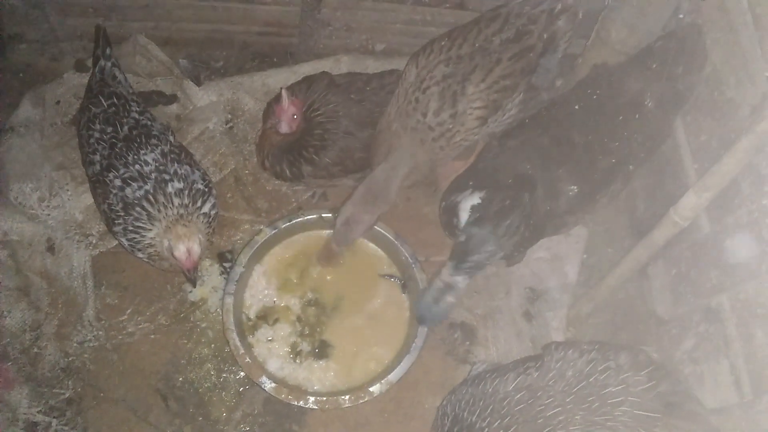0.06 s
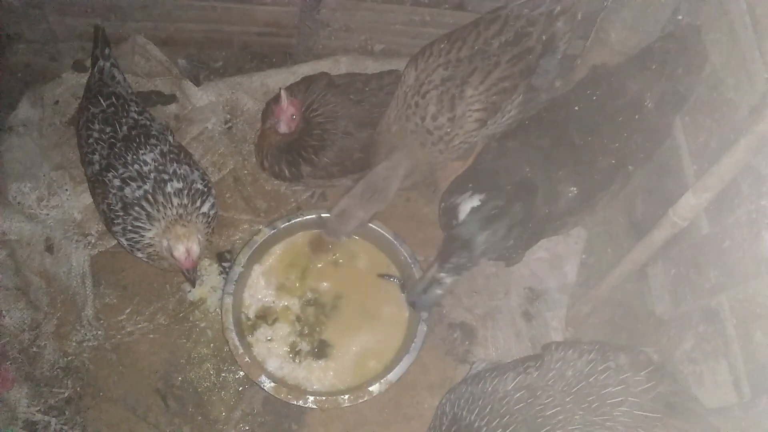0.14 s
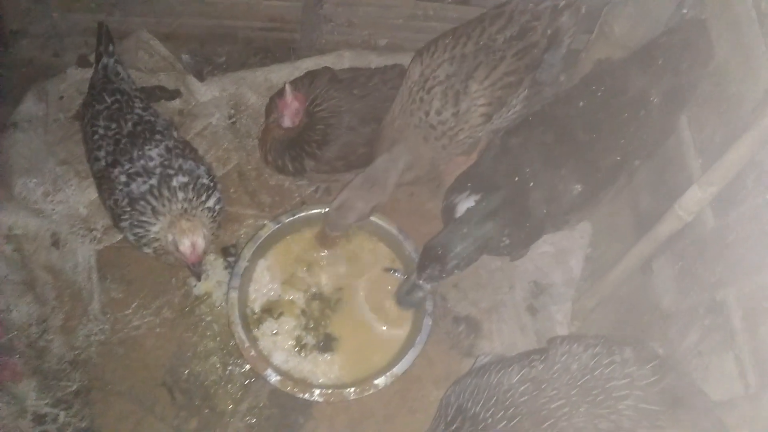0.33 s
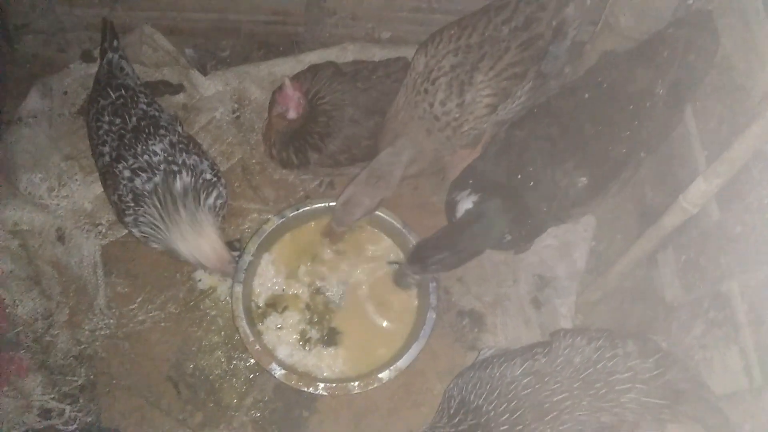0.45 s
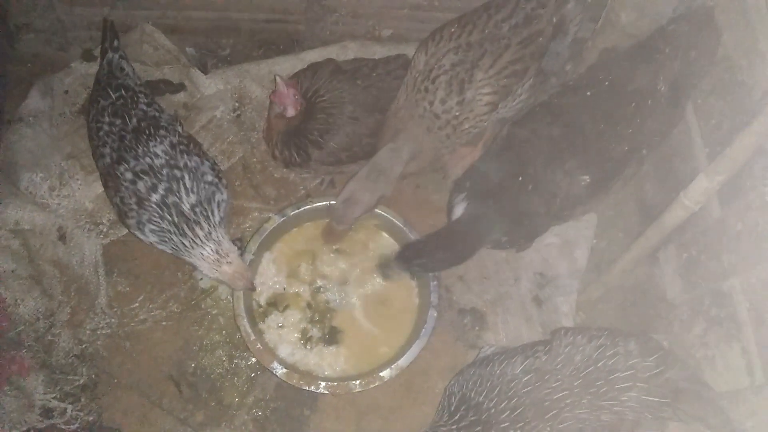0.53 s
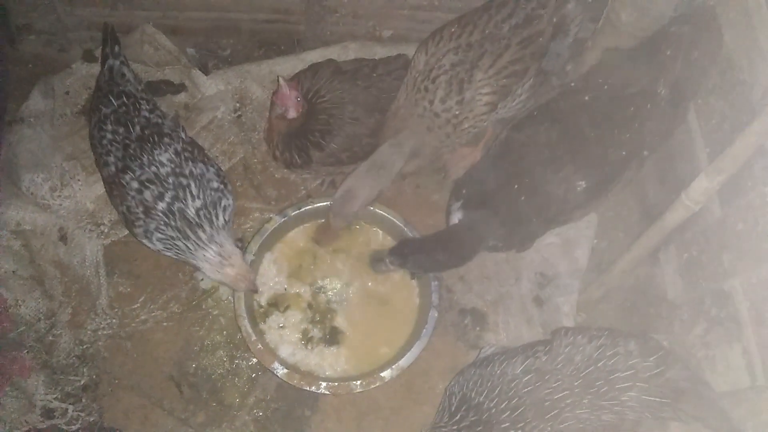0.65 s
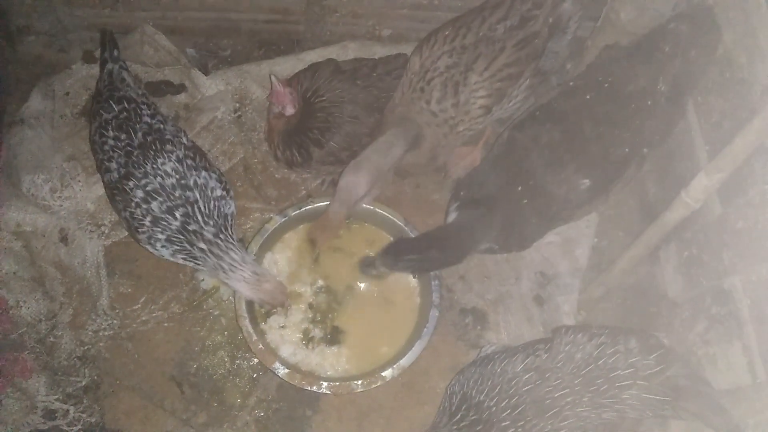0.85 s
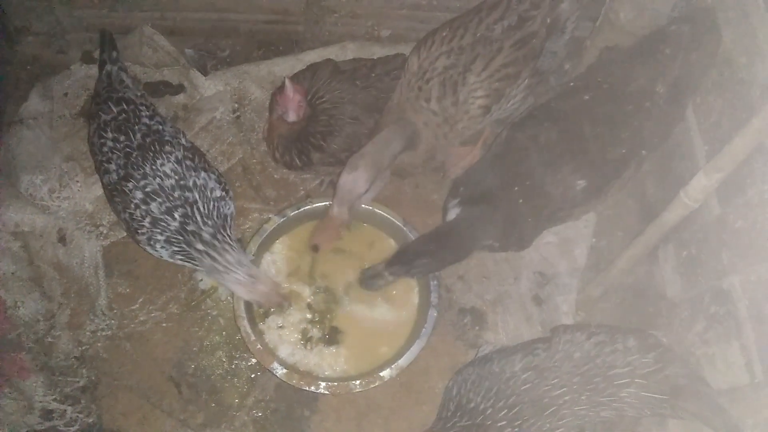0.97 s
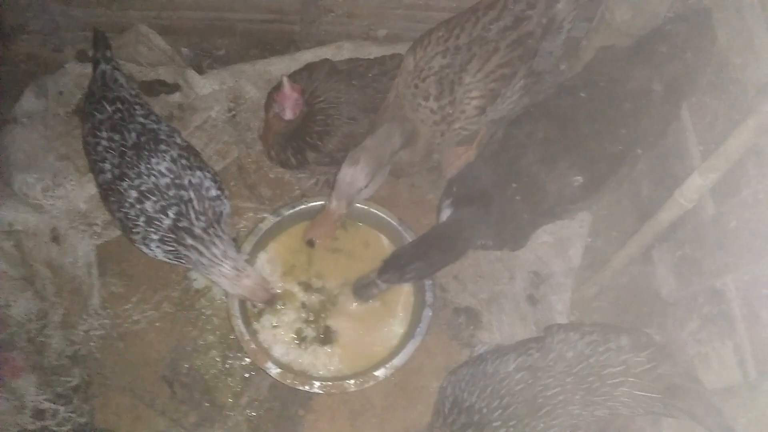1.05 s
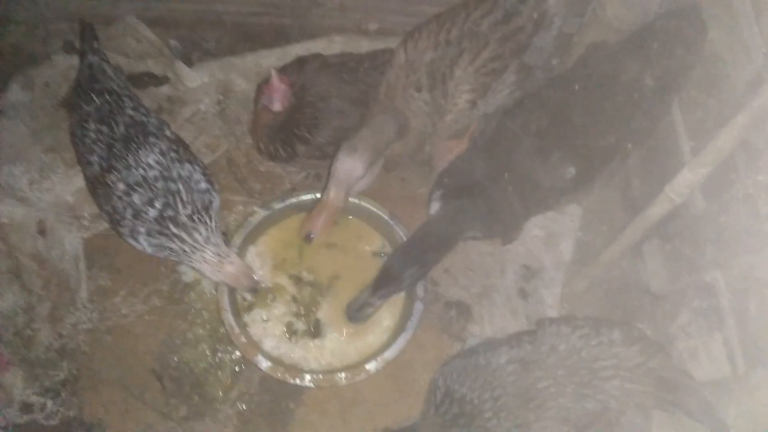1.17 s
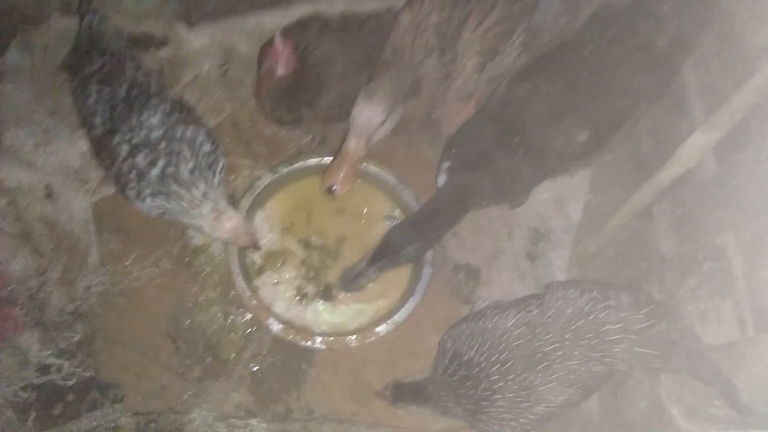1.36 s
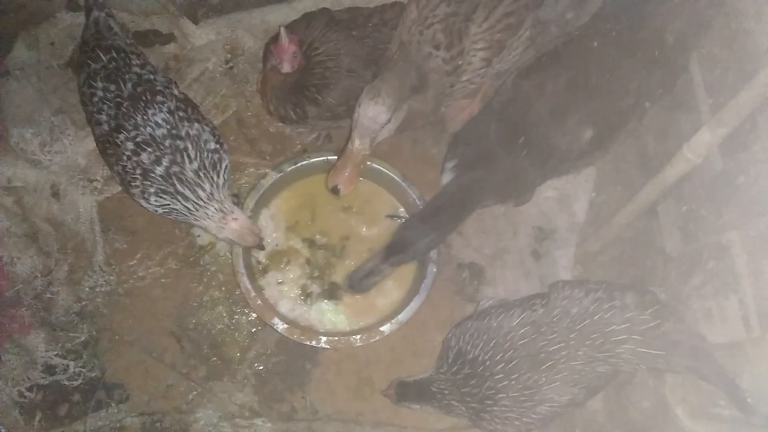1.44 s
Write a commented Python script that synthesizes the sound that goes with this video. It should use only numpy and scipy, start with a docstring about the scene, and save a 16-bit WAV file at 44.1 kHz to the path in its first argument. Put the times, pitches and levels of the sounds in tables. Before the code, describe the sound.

Rapid wet slurping and bubbly plopping as ducks' bills stir thin feed in a metal bowl

```python
"""In a small pen, ducks dabble in a metal bowl of watery feed, with a phone about a metre above.
Bills open air pockets that plop as short rising tones and throw sprays made of many tiny ringing drops.
Small bubbles, fine fizz and a low slosh, made of grains and filtered noise, fill the gaps.
One plink runs on as a thin wavering note; a dull knock, soft taps and low booms are fading tones.
The pen adds a short noise-like echo, and a faint steady air noise lies underneath."""
import sys
import numpy as np
from scipy import signal
from scipy.fft import rfft, irfft
from scipy.io import wavfile

SR = 44100
rng = np.random.default_rng(int(sys.argv[2]) if len(sys.argv) > 2 else 0)


def wav_out(sig):
    """Save sig, one row per channel (or a flat mono array), as 16-bit PCM at SR to the path in sys.argv[1]."""
    wavfile.write(sys.argv[1], SR, np.round(np.clip(np.atleast_2d(sig).T, -1, 1) * 32767).astype(np.int16))


N = 66150  # samples: 1.5 seconds


def undb(db):
    """Turn decibels into a plain multiplier."""
    return 10 ** (np.asarray(db) / 20)


def unit(x):
    """Scale a sound to an average (rms) strength of 1."""
    return x / np.sqrt(np.mean(x ** 2) + 1e-20)


def clock():
    """Time of every sample, in seconds."""
    return np.arange(N) / SR


def frequencies():
    """Frequency of every spectrum step in Hz, plus 1 so that none is zero."""
    return np.arange(N // 2 + 1) * SR / N + 1


def curve(table, col=1):
    """Draw a level over time from rows of time and decibels."""
    rows = np.array(table)
    return undb(np.interp(clock(), rows[:, 0], rows[:, col]))


def colour(x, table):
    """Shape the tone of a sound by points of frequency and decibels."""
    hz, db = np.array(table).T
    gain = undb(np.interp(np.log(frequencies()), np.log(hz), db))
    return irfft(rfft(x) * gain, N)


def band(hz, width_hz):
    """Random noise gathered around one pitch by a steep resonance, rms 1."""
    f = frequencies()
    resonance = 1 / (1 + ((f * f - hz * hz) / (f * width_hz)) ** 2)
    return unit(irfft(rfft(rng.standard_normal(N)) * resonance, N))


def swell(age, rise, decay):
    """Rise smoothly up to age 0, then die away exponentially."""
    attack = np.sin(np.pi / 2 * np.clip(1 + age / rise, 0, 1)) ** 2
    return attack * np.exp(-np.maximum(age, 0) / decay)


PLOP_GLIDE = 0.084  # share of the pitch; a pocket shrinks, so its pitch rises
GRAIN_SCATTER_DB = 3


def grains(start, length, hz, octaves, cycles, count):
    """A cloud of tiny ringing bubbles of scattered pitch and size, rms 1 over its length."""
    when = start + length * (np.arange(count) + rng.random(count)) / count
    pitch = np.clip(hz * 2 ** (octaves * rng.standard_normal(count)), 300, 16000)[:, None]
    size = undb(GRAIN_SCATTER_DB * np.minimum(rng.exponential(size=count), 3))[:, None]
    k = np.arange(int(np.clip(3.5 * cycles * SR / hz, 96, 512)))  # samples within one grain
    turns = pitch * k / SR * (1 + PLOP_GLIDE * k / len(k) / 2)
    shape = (1 - np.exp(-turns ** 2)) * np.exp(-turns / cycles) * (1 - k / len(k))
    rings = size * np.sqrt(pitch / hz) * np.sin(2 * np.pi * turns) * shape
    # add every grain into the sound at its own moment
    at = np.maximum((when * SR).astype(int)[:, None] + k, 0)
    out = np.bincount(at.ravel(), rings.ravel(), N)
    return out[:N] * np.sqrt(length * SR / np.sum(out ** 2))


# air pockets opened by the bills, timed at their peak
# columns: peak_s [s], level_db [dB], pitch_hz [Hz], decay_ms [ms], froth [0-1]
PLOP_TABLE = [(0.2074, -32.5, 1580, 4.3, 0), (0.210, -36.5, 2250, 0.89, 0), (0.237, -32.5, 1803, 3.4, 0.1),
              (0.2619, -42.5, 1439, 7.4, 0), (0.268, -46.5, 2480, 19, 0.8), (0.306, -35.5, 1570, 7.4, 0.5),
              (0.3089, -33.5, 2746, 6.1, 0.55), (0.327, -29.5, 1963, 4, 0.3),
              (0.3293, -27.5, 2280, 5.1, 0.17), (0.404, -34, 1670, 3.9, 1), (0.408, -34, 2017, 4.7, 0),
              (0.4348, -21.5, 2347, 2.9, 0.24), (0.4677, -35, 1690, 3.6, 1), (0.471, -43.5, 990, 4.5, 0.26),
              (0.4978, -39, 2850, 4.4, 0.9), (0.531, -41, 1570, 1.3, 1), (0.5454, -36.5, 1884, 5.2, 0.25),
              (0.611, -37.5, 1654, 2.5, 0.3), (0.7052, -32, 2253, 0.58, 0.03),
              (0.8657, -38, 2334, 0.76, 0.01), (0.9378, -34.5, 2176, 4.6, 0.19),
              (1.042, -32, 2132, 3.4, 0.01), (1.125, -52.5, 2190, 3, 0), (1.147, -44.5, 1560, 7.6, 1),
              (1.168, -47, 2190, 2.8, 0), (1.212, -53.5, 3250, 6.1, 0.1), (1.223, -38, 1930, 3.2, 1),
              (1.225, -47.5, 1160, 6.4, 0.86), (1.331, -57.5, 905, 9.9, 0.5), (1.37, -51.5, 1130, 11, 1),
              (1.379, -41, 2600, 5, 0.66), (1.393, -47.5, 2420, 8.6, 0.06), (1.416, -49, 988, 9.9, 0.14),
              (1.427, -48.5, 1026, 7.9, 0.46), (1.465, -53, 1044, 4.4, 0.15), (1.496, -49, 3100, 3.3, 0)]
PLOP_RISE_S, GLIDE_S = 0.0016, 0.0064
FROTH_WIDTH = 0.35  # width of the froth noise, as a share of the pitch
# small bubbles that break off each frothy plop
SHED_DB, SHED_S, SHED_OCT, SHED_CYCLES = -15, .016, 0.37, 2.96


def plops():
    """Each air pocket rings for a few cycles, rising in pitch; froth roughens it and sheds smaller bubbles."""
    out = np.zeros(N)
    for peak_s, level_db, pitch_hz, decay_ms, froth in PLOP_TABLE:
        age = clock() - peak_s
        froth = np.clip(froth, 0, 1)
        glide = 1 + PLOP_GLIDE * np.tanh(age / GLIDE_S)
        phase = 2 * np.pi * np.cumsum(pitch_hz * glide) / SR
        clear = np.sin(phase - phase[int(peak_s * SR)])
        rough = band(pitch_hz, pitch_hz * FROTH_WIDTH)
        tone = clear * np.sqrt(1 - froth) + rough * np.sqrt(froth / 2)
        body = swell(age, PLOP_RISE_S, decay_ms / 1000) * tone
        shed = grains(peak_s, 4 * SHED_S, pitch_hz, SHED_OCT, SHED_CYCLES, count=24)
        shed = shed * swell(age, PLOP_RISE_S, SHED_S)
        out += undb(level_db) * (body + undb(SHED_DB) * np.sqrt(froth) * shed)
    return out


# bursts of droplets, timed at their peak
# columns: peak_s [s], level_db [dB], centre_hz [Hz], spread_octaves [octaves], decay_ms [ms]
SPRAY_TABLE = [(0.26, -57.5, 4160, 0.05, 9), (0.31, -52, 5060, 0.68, 6.7), (0.329, -43.5, 6440, 0.46, 6.3),
               (0.343, -43.5, 6820, 0.77, 8.5), (0.467, -54, 7700, 0.44, 9.4),
               (0.503, -50, 4050, 0.56, 6.1), (0.519, -51, 9500, 0.046, 4.9),
               (0.54, -43.5, 6200, 0.75, 2.4), (0.6111, -46.5, 4740, 0.704, 6.3),
               (0.61, -47.5, 9130, 0.056, 7.9), (0.662, -48.5, 5090, 0.63, 7.1),
               (0.683, -48, 10130, 0.68, 6.1), (0.7368, -53.5, 6760, 0.63, 1.5),
               (0.862, -62.5, 4240, 0.022, 4.16), (0.945, -53, 5840, 0.59, 12.6),
               (1.039, -57, 9200, 0.72, 7.3), (1.044, -42, 7590, 0.05, 2.5), (1.133, -61.5, 8920, 0.48, 21),
               (1.234, -60.5, 5400, 1.23, 13.2), (1.312, -56, 10170, 0.51, 7.5),
               (1.397, -51.5, 7760, 0.56, 7.4), (1.434, -42.5, 10730, 0.5, 3.3),
               (1.474, -49.5, 5130, 0.46, 7.9)]
SPRAY_RISE_SHARE = 0.42  # rise time as a share of the decay
DROP_CYCLES = 14  # ringing of a fine drop


def sprays():
    """Bursts of droplets; those of nearly one size ring longer and whistle."""
    out = np.zeros(N)
    for peak_s, level_db, centre_hz, spread_octaves, decay_ms in SPRAY_TABLE:
        decay = decay_ms / 1000
        rise = SPRAY_RISE_SHARE * decay
        cycles = DROP_CYCLES / (2 * max(spread_octaves, .05))
        drops = grains(peak_s - rise, rise + 5 * decay, centre_hz, spread_octaves, cycles, count=260)
        out += undb(level_db) * swell(clock() - peak_s, rise, decay) * drops
    return out


# how busy the dabbling is
# columns: time_s [s], bubbles_db [dB], fizz_db [dB]
DABBLE_TABLE = [(0, -61, -77.5), (0.05, -102, -98.5), (0.19, -80, -92.5), (0.27, -70, -67.5),
                (0.39, -64.5, -76), (0.48, -56.5, -68.5), (0.68, -62.5, -76.5), (0.78, -70, -84.5),
                (1.02, -74, -78), (1.10, -79, -95), (1.24, -64, -74), (1.31, -72, -87), (1.39, -64, -66),
                (1.5, -69, -64.5)]
BUBBLE_HZ, BUBBLE_OCT, BUBBLE_CYCLES = 1664, 0.493, 5.3
FIZZ_HZ, FIZZ_OCT = 7340, 0.815


def dabbling():
    """Small ringing bubbles and a much denser, higher fizz as the bills stir the feed."""
    bubbles = grains(0, N / SR, BUBBLE_HZ, BUBBLE_OCT, BUBBLE_CYCLES, count=420)
    fizz = grains(0, N / SR, FIZZ_HZ, FIZZ_OCT, DROP_CYCLES, count=5000)
    return bubbles * curve(DABBLE_TABLE) + fizz * curve(DABBLE_TABLE, 2)


# level of the stirred feed's low slosh
# columns: time_s [s], level_db [dB]
SLOSH_LEVEL = [(0, -104), (0.45, -77.5), (0.57, -82.5), (0.66, -78), (1.5, -80)]
SLOSH_HZ, SLOSH_WIDTH_HZ = 440, 1280


def slosh():
    """Broad low noise that rises and falls as the feed is stirred."""
    return band(SLOSH_HZ, SLOSH_WIDTH_HZ) * curve(SLOSH_LEVEL)


# pitch of the wavering note, up to its end
# columns: time_s [s], pitch_hz [Hz]
NOTE_PITCH = [(0.739, 1159), (0.79, 1195), (0.823, 1131), (0.859, 1215), (0.965, 1269)]
RING_S, RING_DB, RING_DECAY_S = .7378, -37.5, 0.0036
RING_TAIL_DB, RING_FADE_S = -54.5, 0.28


def ring():
    """A plink that runs on as a thin, fluttering note whose pitch wavers and ends higher."""
    age = clock() - RING_S
    when, hz = np.array(NOTE_PITCH).T
    phase = 2 * np.pi * np.cumsum(np.interp(clock(), when, hz)) / SR
    plink = undb(RING_DB) * swell(age, 0.00044, RING_DECAY_S)
    flutter = (.5 + np.abs(band(26., 30.))) / 2  # slow random noise shakes the level
    stop = np.clip((when[-1] - clock()) / RING_DECAY_S + 1, 0, 1)
    fade = swell(age - RING_DECAY_S, RING_DECAY_S, RING_FADE_S)
    tail = undb(RING_TAIL_DB) * fade * stop * flutter
    return (plink + tail) * np.sin(phase)


# tones of the nudged bowl
# columns: pitch_hz [Hz], level_db [dB]
KNOCK_TONES = [(283.6, -58), (840, -55.5), (61.6, -64)]
KNOCK_S, KNOCK_DECAY_S = 1.247, 0.015


def knock():
    """A nudge makes the bowl sound several tones at once, which die away as one dull knock."""
    age = clock() - KNOCK_S
    tones = sum(undb(level_db) * np.sin(2 * np.pi * hz * age) for hz, level_db in KNOCK_TONES)
    return tones * swell(age, 0.0022, KNOCK_DECAY_S)


# soft taps, timed at the thud
# columns: thud_s [s], level_db [dB]
TAP_TABLE = [(0.573, -49), (0.890, -45), (0.993, -46), (1.118, -45)]
TAP_HZ, TAP_DECAY_S = 550, 0.00071
TAP_LEAD_S, TAP_LEAD_DB, TAP_LEAD_HZ = 0.00505, -12, 392  # the touch ahead of the thud


def taps():
    """Dull double taps: a light touch, then a thud of about one cycle."""
    out = np.zeros(N)
    for thud_s, level_db in TAP_TABLE:
        age = clock() - thud_s
        lead_age = age + TAP_LEAD_S
        touch = swell(lead_age, 0.0052, 0.0013) * np.sin(2 * np.pi * TAP_LEAD_HZ * lead_age)
        thud = -swell(age, 0.0003, TAP_DECAY_S) * np.sin(2 * np.pi * TAP_HZ * age - np.pi / 2 + .5)
        out += undb(level_db) * (thud + undb(TAP_LEAD_DB) * touch)
    return out


# low booms, timed at their peak
# columns: peak_s [s], level_db [dB], rise_s [s], decay_s [s]
BOOM_TABLE = [(0.18, -59.5, 0.063, 0.045), (0.555, -54, 0.052, 0.09), (1.339, -63, 0.032, 0.084)]
BOOM_HZ, BOOM_SAG_HZ, BOOM_SAG_S = 82.7, 20.76, .055  # pitch at the peak, and its fall


def booms(rough=0.22):
    """Faint low tones that sag in pitch, roughened by a little noise."""
    out = np.zeros(N)
    for peak_s, level_db, rise_s, decay_s in BOOM_TABLE:
        age = clock() - peak_s
        pitch = BOOM_HZ - BOOM_SAG_HZ * np.tanh(age / BOOM_SAG_S)
        tone = np.sin(2 * np.pi * np.cumsum(pitch) / SR)
        out += undb(level_db) * swell(age, rise_s, decay_s) * (tone + rough * band(BOOM_HZ, BOOM_HZ))
    return out


# echo of the pen; t60_s is the time to fall by 60 dB
# columns: centre_hz [Hz], level_db [dB], t60_s [s]
PEN_ECHO = [(300, -6.5, 0.22), (870, -6, 0.11), (3240, -5.5, 0.16), (11300, -8.5, 0.24)]
PEN_DELAY_S = 0.0016


def pen(x):
    """Short diffuse echo of floor and walls: fading noise with its own level and decay in each band."""
    echo = np.zeros(N)
    centres = np.log([row[0] for row in PEN_ECHO])
    # each row of the identity matrix picks out one band, blending into its neighbours
    for share, (centre_hz, level_db, t60_s) in zip(np.eye(len(PEN_ECHO)), PEN_ECHO):
        fall = swell(clock() - PEN_DELAY_S, PEN_DELAY_S / 2, t60_s / np.log(1000))
        weight = np.sqrt(np.interp(np.log(frequencies()), centres, share))
        noise = irfft(rfft(rng.standard_normal(N)) * weight, N)
        echo += undb(level_db) * noise * fall / np.sqrt(np.sum(fall ** 2))
    return signal.fftconvolve(x, echo)[:N]


# tone of the steady air noise; only the differences between levels count
# columns: frequency_hz [Hz], relative_level_db [dB]
AIR_TONE = [(25, -4), (60, 8.5), (500, -5.5), (1600, 3), (2300, -7.5), (4000, -16), (15000, -20.5)]
AIR_DB = -78


def air():
    """Steady random noise, strongest in the lows."""
    return undb(AIR_DB) * unit(colour(rng.standard_normal(N), AIR_TONE))


# how much of the side sound is let through at each frequency
# columns: frequency_hz [Hz], gain_db [dB]
SIDE_GAIN = [(3800, -55.5), (8000, -4), (13000, -5)]


def scene():
    """The bowl sits in the centre; droplets and the treble of echo and air spread sideways."""
    near = plops() + sprays() + dabbling() + slosh() + ring() + knock()
    mid = near + pen(near) + taps() + booms() + air()
    # fresh random draws make the side differ from the middle
    side = colour(pen(near) + sprays() / 2 + air(), SIDE_GAIN)
    return np.array([mid + side, mid - side])


TOP_HZ = 14400


def record(dry):
    """The phone cuts the top: a steep filter removes what lies above its limit."""
    top_cut = signal.ellip(10, .2, 70, TOP_HZ, fs=SR, output="sos")
    return signal.sosfilt(top_cut, dry)


dry = scene()
out = record(dry)
wav_out(out)
```